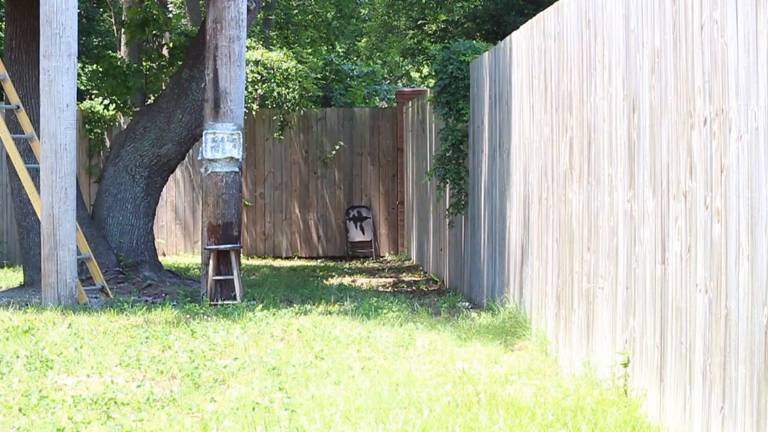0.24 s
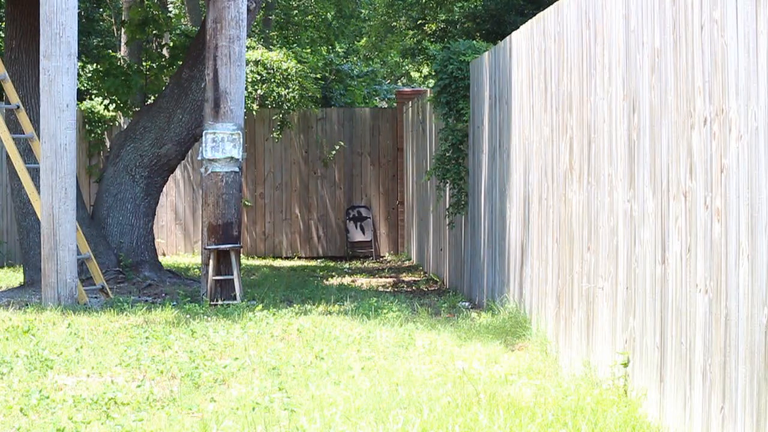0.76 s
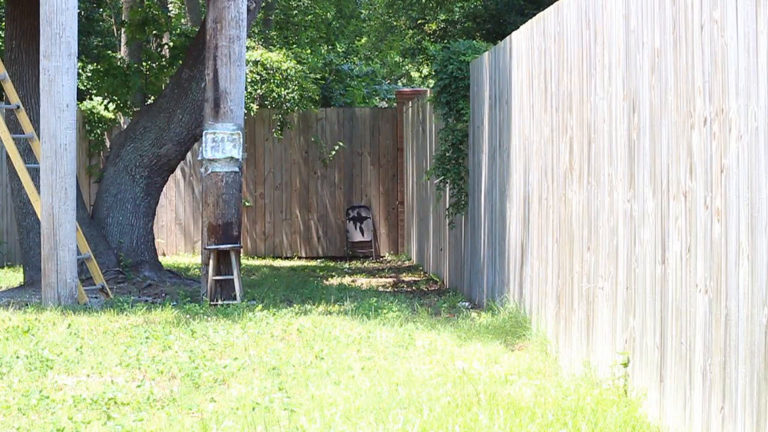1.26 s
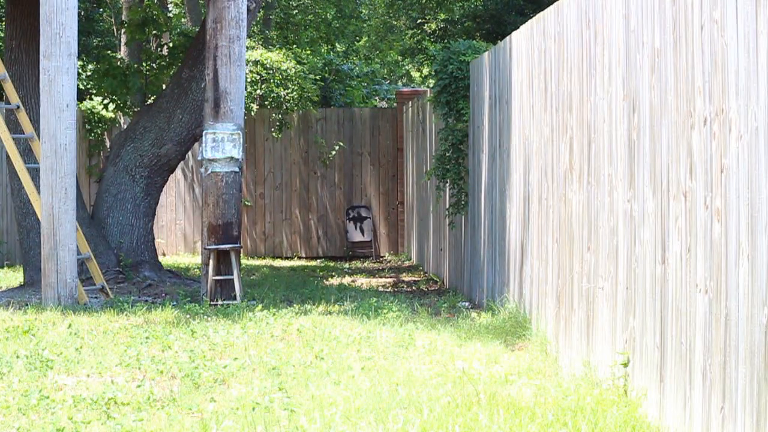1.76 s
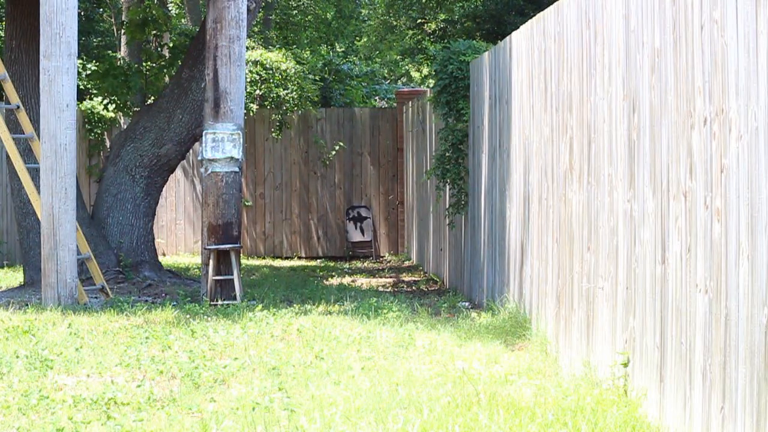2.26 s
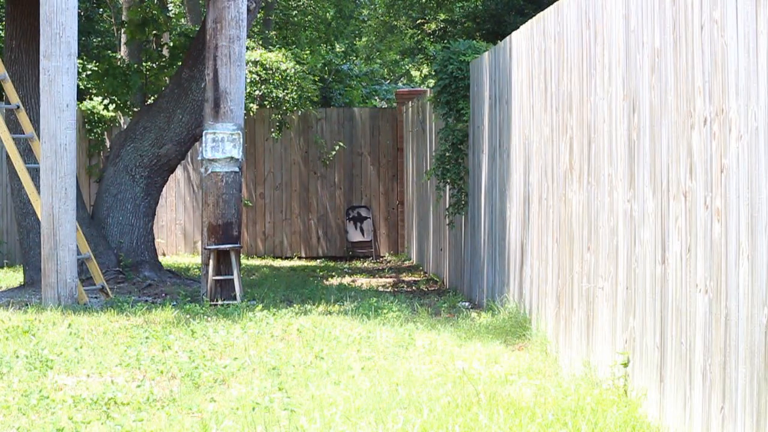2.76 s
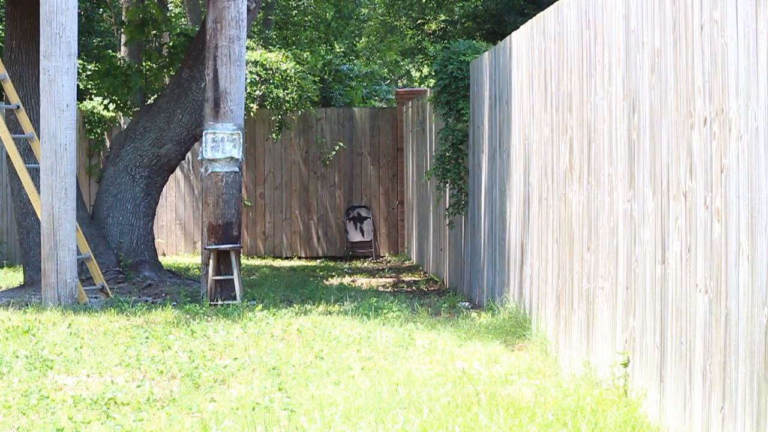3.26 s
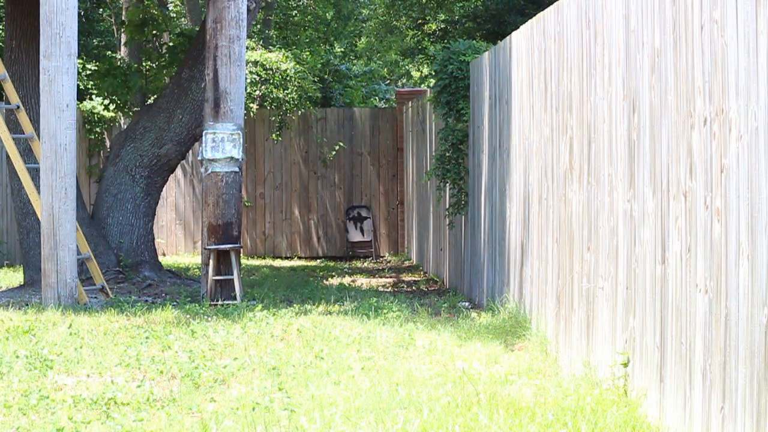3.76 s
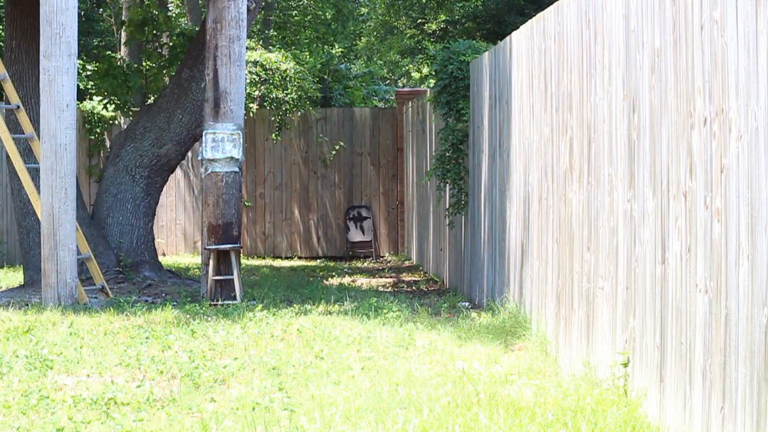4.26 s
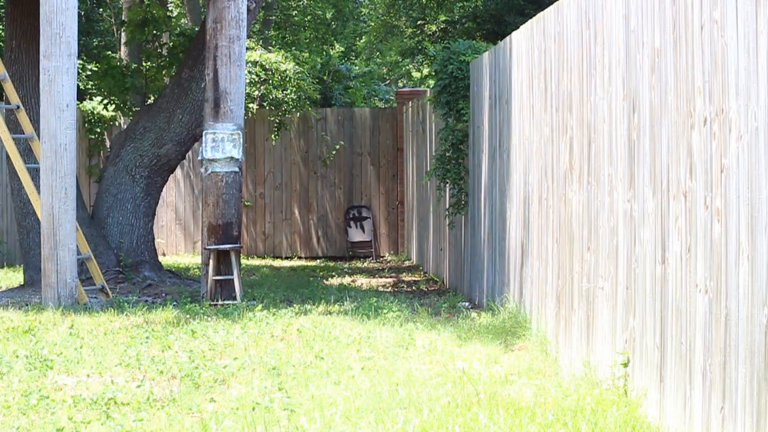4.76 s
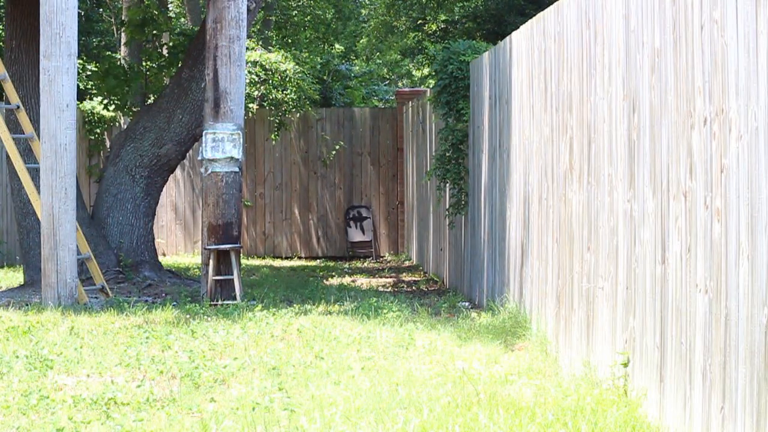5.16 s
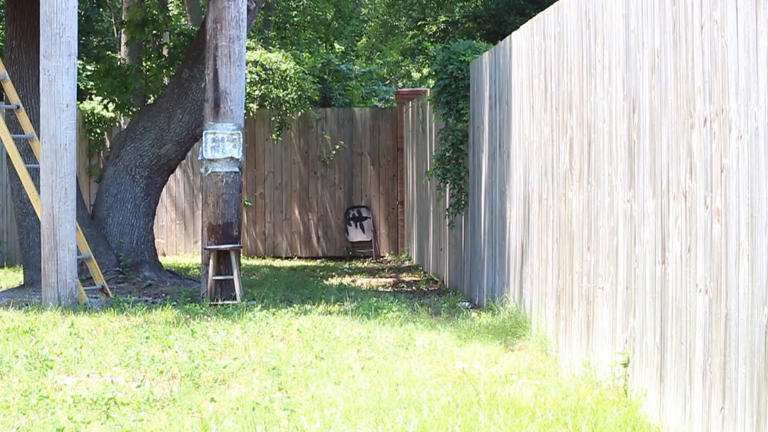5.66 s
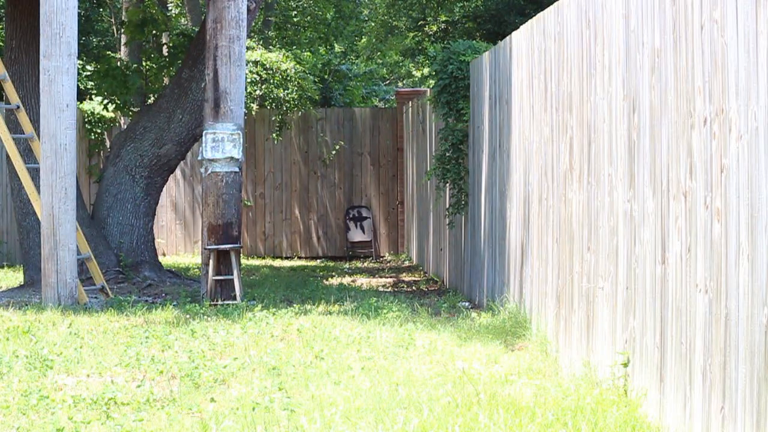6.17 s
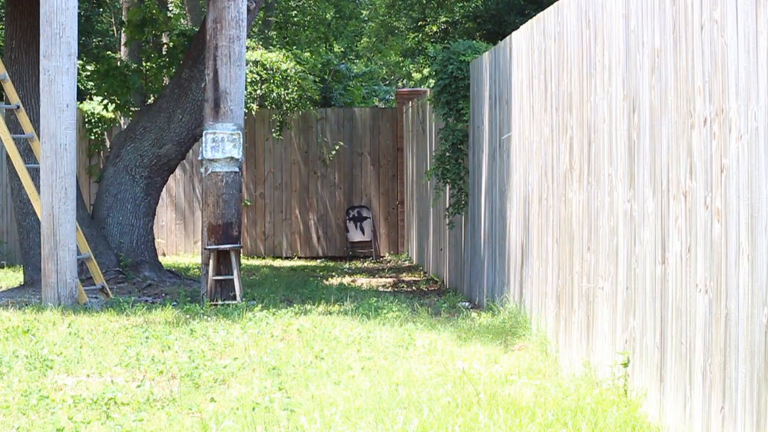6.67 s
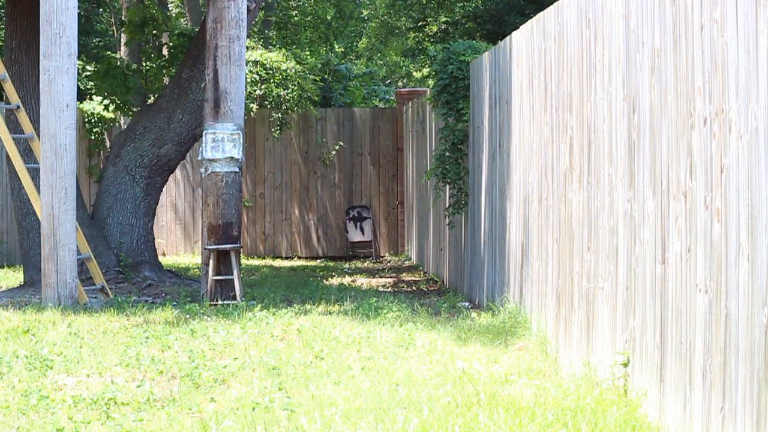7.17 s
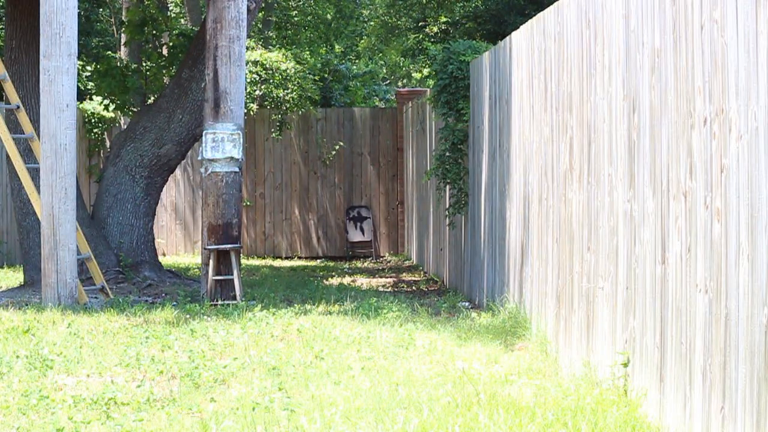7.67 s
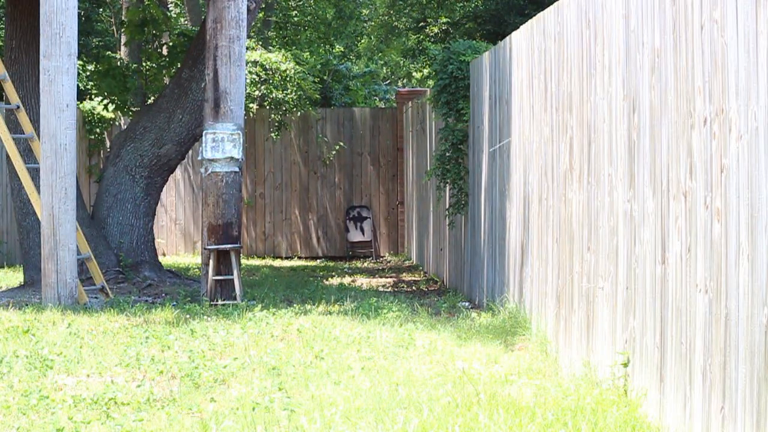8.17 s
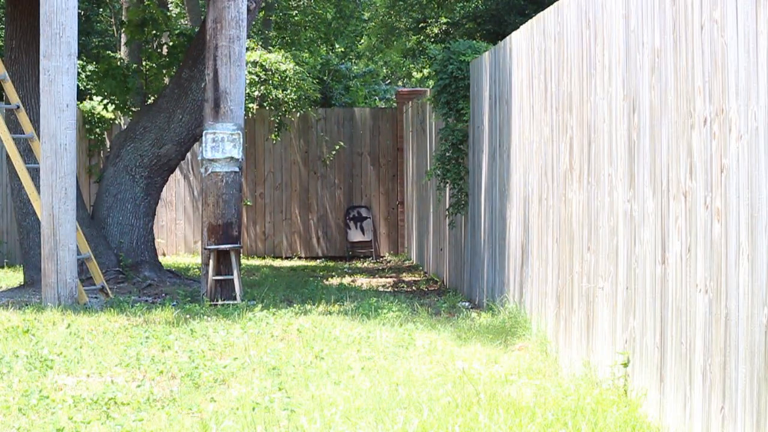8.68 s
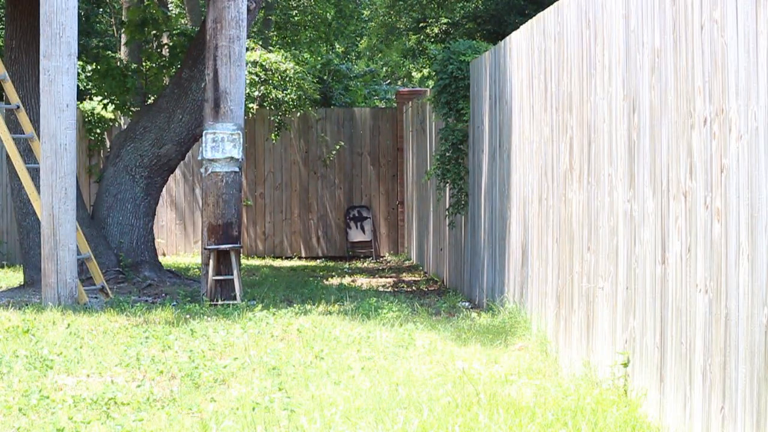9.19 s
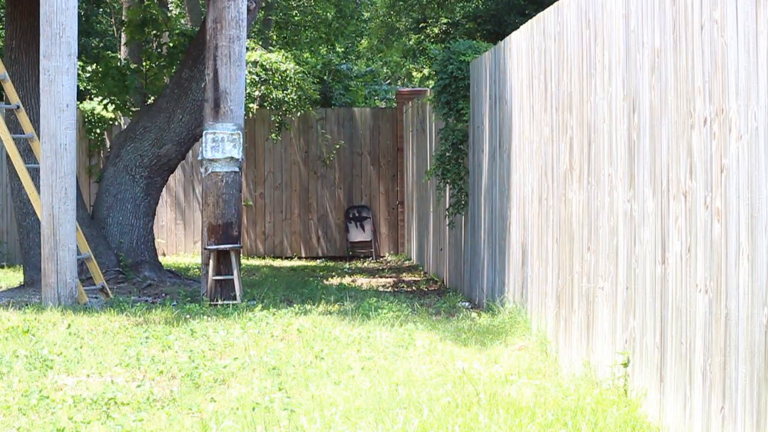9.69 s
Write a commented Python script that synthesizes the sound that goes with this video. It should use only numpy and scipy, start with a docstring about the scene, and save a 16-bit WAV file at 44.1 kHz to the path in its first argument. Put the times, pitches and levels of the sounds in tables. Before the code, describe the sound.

An electric airsoft rifle fires steady single shots in a fenced yard, each a short gear whirr and sharp pop, then a metallic target ring.

```python
"""An electric airsoft rifle fires twelve single shots in a fenced back yard, close to the microphone.
Each time the gears wind the spring, the piston slams home with a pop, and the fences echo it.
About half a second after each shot but the last, the pellet excites the modes of a sheet-metal target;
one such ring comes before the first shot. A far engine is a gliding near-sine, wind and air are coloured
noise, the hum is a sine, and an insect and birds are narrow-band noise, all faint behind the shots."""
import sys
import numpy as np
from scipy import signal
from scipy.fft import rfft, irfft, next_fast_len
from scipy.io import wavfile

SR = 44100
rng = np.random.default_rng(int(sys.argv[2]) if len(sys.argv) > 2 else 0)


def output_pcm(signal):
    """Save a mono or channel-first signal as 16-bit PCM at the path in sys.argv[1].

    Samples are clipped to [-1, 1] before scaling.
    """
    pcm = np.clip(np.atleast_2d(signal).T, -1, 1) * 32767
    wavfile.write(sys.argv[1], SR, np.round(pcm).astype(np.int16))


N = 437913
TIME = np.arange(N) / SR   # s

# Table levels are relative: each source adds its own trim. Spectra are shapes, scaled to unit power.

# Background
# Wind spectrum on the microphone: f/Hz, level/dB
WIND_SPECTRUM = [(12, -2.5), (25, 2.5), (42, -3), (65, -6.5), (100, -15), (160, -30), (300, -47),
                 (1000, -76), (8000, -110)]
# Spectrum of the neighbourhood's hush: f/Hz, level/dB
AIR_SPECTRUM = [(40, -5), (120, 0), (180, -6.5), (300, -13), (550, -17.5), (1000, -19), (2000, -25.5),
                (4000, -33.5), (6000, -42.5), (8000, -47.5), (12000, -51), (16000, -76)]
# Strength of the breeze: t/s, level/dB
BREEZE_LEVEL = [(0, -46.5), (.65, -50), (.9, -56.5), (1.5, -39.5), (2.8, -39), (3.3, -44.5), (4.1, -41),
                (4.6, -46), (5.4, -42), (6.0, -46.5), (7.0, -43.5), (8.4, -38.5), (8.8, -51.5), (9.4, -46),
                (9.93, -45.5)]
# Gusts that buffet the microphone: t of peak/s, length/s, level/dB
GUSTS = [(2.052, 0.41, -38.5), (5.02, .58, -31), (7.66, 0.19, -34), (8.206, 0.31, -34), (9.15, .3, -31.5)]
# Engine loudness as the air carries it over: t/s, level/dB
ENGINE_LEVEL = [(0.0, -63), (0.61, -56), (2.68, -38), (3.04, -51.5), (3.43, -39), (3.51, -44), (4.7, -35),
                (5.2, -52), (5.58, -38), (5.95, -53), (6.19, -39), (6.61, -46.5), (6.88, -36), (7.11, -44),
                (7.38, -34.5), (7.55, -45), (8.54, -46), (8.63, -40), (8.99, -57.5), (9.18, -43.5),
                (9.49, -60.5), (9.93, -48)]
# The engine runs up to speed, quickly at first, then creeping on to its top speed
ENGINE_START_HZ, ENGINE_RUN_UP_HZ, RUN_UP_S, CREEP_HZ_PER_S, TOP_SPEED_HZ = 74.76, 13, .85, .95, 94.6
# The insect chirps in pairs at a nearly steady pace
FIRST_CHIRP_S, CHIRP_PERIOD_S, PAIR_GAP_S, CHIRP_JITTER_S = .05, 1, .16, .02
# Whistles of far birds: t/s, length/s, f/Hz, level/dB
BIRD_CALLS = [(1.0, .22, 5600, -78), (7.331, 0.11, 3800, -79), (7.4, 0.098, 5640, -82),
              (8.138, .14, 3800, -74.5), (8.25, .1, 5710, -81.5)]

# Target
# Pellet on the plate: t/s, low ring level/dB, high ring level/dB
PELLET_HITS = [(0.3285, -43, -42), (1.2079, -43, -40.5), (2.14, -56.5, -52), (3.075, -58, -52.5),
               (3.9875, -44.5, -40), (4.9209, -43, -41), (5.829, -43, -42), (6.754, -63.5, -72),
               (7.585, -45.5, -42.5), (8.4099, -53.5, -58.5), (9.0827, -47.5, -40), (9.8161, -47, -40)]
# Spectrum of the struck plate: f/Hz, level/dB
PLATE_SPECTRUM = [(500, -24.5), (1000, -14), (1400, -10.5), (2000, -0.5), (2600, -3), (3600, -1.5),
                  (5300, 1), (7000, -0.5), (9000, 1.5), (12500, 2), (14500, -5), (16000, -24.5)]
# Decay of the plate by 60 dB: f/Hz, t60/s
PLATE_DECAY = [(1000, 1.5), (2000, .85), (4000, .68), (6000, 0.57), (10000, 0.39), (16000, 0.19)]
# The plate's clearest modes: f/Hz, level/dB
PLATE_MODES = [(1098, -12.5), (1550, -8), (1911, -4), (3168, -4), (3563, -6), (3744, -0.5), (4163, -8.5),
               (5342, -3.5)]
# A few modes set singing by two glancing hits: t/s, f/Hz, level/dB, t60/s
GLANCING_PINGS = [(3.075, 9100, -56, 0.51), (3.075, 9100, -37, 0.025), (3.075, 12400, -40, 0.016),
                  (3.075, 5100, -56.5, 0.34), (3.075, 11400, -60.5, .35), (8.4102, 10220, -36, 0.07),
                  (8.4104, 3520, -50.5, 0.12), (8.4104, 5225, -51, .12), (8.4104, 1900, -52, .12)]

# Yard
# Echoes off fences and trees: delay/s, level/dB, smear/s, low-pass f/Hz
ECHOES = [(.0047, -9, .00012, 15000), (.073, -27.5, 0.0052, 7010), (.117, -31.5, 0.01, 2802),
          (.229, -41.5, 0.0086, 3500), (.272, -55.5, 0.018, 8800)]
# Decay of the yard's tail by 60 dB: f/Hz, t60/s
YARD_DECAY = [(150, .4), (600, .6), (2000, 0.93), (5000, 0.54), (10000, 0.44), (16000, 0.32)]

# Rifle
# Shots: t of the piston's impact/s, crack level/dB, motor level/dB, body ring level/dB, wind-up/s
SHOTS = [(0.6568, -1, 0.5, 1, 0.11), (1.5875, -3, 1, 1.5, 0.1), (2.525, -2, -0.5, 0.5, 0.1),
         (3.4356, -2.5, 1, 0, 0.1), (4.3667, -3, 0.5, 1, 0.1), (5.275, -1.5, 0.5, 1, 0.11),
         (6.1814, -2.5, 0, -0.5, 0.1), (7.0297, -4.5, -1, -2, 0.1), (7.8524, -5.5, -1.5, -1, .102),
         (8.525, -4.5, -1, -2, 0.1), (9.2588, -4.5, -1.5, -3, 0.11), (9.9238, -5.5, -1.5, 4, 0.1)]
# Sear, piston sliding, piston head, air blast, rebounds, latch: t from impact/s, level/dB, fade/s
FIRING_CONTACTS = [(-.0099, -23, 0.0014), (-.0064, -19.5, 0.0032), (-.0036, -19, .003),
                   (-.0022, -13.5, .0015), (-.0012, -4.5, 0.00072), (-.0002, 3, .0004), (0.0113, -22, .003),
                   (0.0188, -23.5, 0.0034), (.068, -42, .009)]
# Spectrum of the contacts: f/Hz, level/dB
CRACK_SPECTRUM = [(200, -9.5), (620, -14.5), (1000, -6), (2000, -4.5), (3000, -5), (5000, -3.5), (6200, -5),
                  (8700, -1.5), (12000, -2.5), (13800, -1.5), (16000, -16.5)]
# Nominal modes of the hollow body: f/Hz, level/dB, t60/s, t from impact/s
BODY_MODES = [(133.4, -33, 0.12, -.002), (279, -36, 0.09, -0.0078), (775, -26.5, 0.0036, -.0012),
              (383, -30.5, 0.045, .004), (497, -25.5, .06, 0.011), (730, -38.5, 0.027, 0.022),
              (814, -25, .05, .0045), (857, -26.5, .05, .0057), (1233, -30.5, .06, .0046),
              (1310, -31, 0.03, .0053)]
# Gearbox resonances: f/Hz, width/Hz, level over the broad whirr/dB
GEARBOX_MODES = [(500, 150, 5), (826, 160, 4), (1040, 60, 5), (1375, 70, 12), (1709, 47, 14.5),
                 (2710, 110, 6.5), (3000, 80, 4), (3290, 230, 8.5), (3430, 170, 3.5), (5370, 150, 6.5)]
# Spectrum of the broad whirr: f/Hz, level/dB
WHIRR_SPECTRUM = [(150, -21.5), (350, -14.5), (500, -3.5), (650, -4), (900, 1.5), (1500, -4.5), (2300, -3),
                  (3600, -4.5), (6000, -8.5), (8500, -13.5), (12500, -13), (14500, -21.5), (16000, -38)]
# Load on the gears: t as a share of the wind-up, level/dB
GEAR_LOAD = [(0, -17.5), (.22, -10), (.4, -4), (.62, -2), (.9, -2), (1.05, -7.5), (1.65, -9.5), (1.9, -33)]
# Knocks as the trigger resets after most shots: t/s, level/dB
RESET_KNOCKS = [(0.7735, -42.5), (1.6946, -47.5), (2.642, -43), (4.4706, -47), (5.3908, -41.5),
                (6.2941, -44.5), (7.152, -43.5), (7.9564, -49), (8.6359, -46)]
# Trigger clicks: t/s, level/dB
TRIGGER_CLICKS = [(6.7541, -50.5), (6.768, -53), (7.2988, -51), (7.309, -53.5), (8.0557, -48.5),
                  (8.341, -64), (8.887, -48), (8.896, -55.5), (9.5458, -49), (9.749, -63)]
# Spectrum of the trigger clicks: f/Hz, level/dB
TRIGGER_SPECTRUM = [(300, -17), (1000, -1.5), (2800, 3), (6000, -2.5), (11000, -3), (13500, -4),
                    (16000, -32.5)]
# Spring and loose parts after the impact: f/Hz, level/dB
SHIVER_SPECTRUM = [(200, -11.5), (500, -3.5), (900, 2), (2000, 0), (3500, 0.5), (6000, -4), (9000, -1.5),
                   (12500, -5.5), (14500, -18), (16000, -36)]
# Decay of their shiver by 60 dB: f/Hz, t60/s
SHIVER_DECAY = [(300, 0.53), (1500, 0.93), (4000, .52), (9000, .42), (16000, .25)]
# Hollow tones of one shot: t/s, f/Hz, level/dB, t60/s
HOLLOW_TONES = [(6.183, 343, -26, 0.073), (6.183, 154.4, -32, 0.1)]


def from_db(db):
    """Level in decibels to amplitude ratio."""
    return 10 ** (np.asarray(db) / 20)


def rms_one(x):
    """Normalise to unit root-mean-square."""
    return x / np.sqrt(np.mean(x ** 2) + 1e-20)


def at_hz(points, hz):
    """Interpolate a frequency table on a logarithmic frequency axis."""
    known, values = np.transpose(points)
    return np.interp(np.log(np.maximum(hz, 1)), np.log(known), values)


def add(out, s, sound):
    """Superpose a sound at time s, cut to fit."""
    start = int(round(s * SR))
    first = max(start, 0)
    last = min(start + sound.shape[-1], out.shape[-1])
    if last > first:
        out[..., first:last] += sound[..., first - start:last - start]


def colour(x, spectrum, size=8192):
    """Minimum-phase filtering by the folded cepstrum; white noise keeps its power."""
    level = at_hz(spectrum, np.fft.rfftfreq(size, 1 / SR))
    cepstrum = irfft(np.log(from_db(level)))
    cepstrum[1:size // 2] *= 2
    cepstrum[size // 2 + 1:] = 0
    response = irfft(np.exp(rfft(cepstrum)))
    response /= np.linalg.norm(response)
    response = response.reshape((1,) * (x.ndim - 1) + (-1,))
    return signal.oaconvolve(x, response, axes=-1)[..., :x.shape[-1]]


def resonance(x, hz, width):
    """Two-pole resonance of this bandwidth (Hz), near unit gain at its peak."""
    r = np.exp(-np.pi * width / SR)
    zeros = np.array([1, 0, -1]) * (1 - r * r) / 2
    poles = [1, -2 * r * np.cos(2 * np.pi * hz / SR), r * r]
    return signal.lfilter(zeros, poles, x + 1e-18)


def ring(hz, t60, phase=0):
    """Free vibration of one damped mode: a sine in an exponential envelope of initial height 1."""
    t = TIME[:SR // 2]
    return np.sin(2 * np.pi * hz * t + phase) * np.exp(-np.log(1000) * t / t60)


def burst(fade, channels=1):
    """Flat-spectrum decaying noise, with the energy of an exponential envelope starting at 1."""
    envelope = np.exp(-TIME[:SR // 8] / fade)
    noise = rng.standard_normal((channels, len(envelope))) * envelope
    # keep the phases, make every magnitude equal
    flat = irfft(np.exp(1j * np.angle(rfft(noise))), len(envelope))
    noise = flat * envelope ** (1 / 4)
    return noise * np.linalg.norm(envelope) / np.linalg.norm(noise, axis=-1, keepdims=True)


def dying(x, t60_table, count=12):
    """Frequency-dependent damping: overlapping bands each decay at their own rate."""
    size = x.shape[-1]
    hz_axis = np.fft.rfftfreq(size, 1 / SR)
    centres = np.geomspace(150, 16000, count)
    spectrum, out = rfft(x), 0
    for hz, share in zip(centres, np.eye(count)):
        band = irfft(spectrum * np.interp(hz_axis, centres, share), size)
        out = out + band * np.exp(-np.log(1000) * TIME[:size] / at_hz(t60_table, hz))
    return out


def blend(pair, alike):
    """Interchannel correlation: mix two unrelated signals as sum and difference."""
    alike = np.clip(alike, 0, 1)
    middle = np.sqrt(1 + alike) * pair[0]
    side = np.sqrt(1 - alike) * pair[1] * np.array([[1], [-1]])
    return (middle + side) / np.sqrt(2)


def whistle(hz, length, width):
    """Narrow-band noise from two cascaded resonances, in a half-sine swell, at unit rms."""
    size = int(length * SR)
    narrow = resonance(rng.standard_normal((2, size)), hz, width)
    narrow = resonance(narrow, hz, width)
    return rms_one(narrow * np.sin(np.pi * np.arange(size) / size))


def drift(rate, step=200):
    """Low-passed random fluctuation of unit spread with a corner at about this rate (Hz)."""
    size = N // step
    r = np.exp(-2 * np.pi * rate * step / SR)
    slow = signal.lfilter([1], [1, -2 * r, r * r], rng.standard_normal(2 * size))
    return np.interp(np.arange(N) / step, np.arange(size), rms_one(slow[size:]))   # settled half


def hum(level_db=-62, pitch_hz=120):
    """A steady pure tone: the faint electrical hum of the neighbourhood."""
    return np.sqrt(2) * from_db(level_db) * np.sin(2 * np.pi * pitch_hz * TIME)


def outdoors(wind_db=1.04, air_db=-56, eddy_db=1.5, eddy_rate=5, wind_alike=0.97):
    """Turbulent pressure: noise modulated by breeze, gusts and eddies, over a steady hush of air."""
    force = from_db(np.interp(TIME, *np.transpose(BREEZE_LEVEL)))
    for s, length, db in GUSTS:
        gust = from_db(db) * np.exp(-(2 * (TIME - s) / length) ** 4)
        force = np.hypot(force, gust)
    eddies = from_db(wind_db + eddy_db * drift(eddy_rate))
    rumble = colour(blend(rng.standard_normal((2, N)), alike=wind_alike), WIND_SPECTRUM)
    hush = colour(blend(rng.standard_normal((2, N)), alike=.55), AIR_SPECTRUM)
    return force * eddies * rumble + from_db(air_db) * hush


def insect(level_db=-82.5, pitch_hz=9800, width=350, length=0.068):
    """Periodic stridulation: thin, high narrow-band chirps from the hedge, two at a time."""
    out = np.zeros((2, N))
    for s in np.arange(FIRST_CHIRP_S, N / SR, CHIRP_PERIOD_S):
        for offset in (0, PAIR_GAP_S):
            chirp_s = s + offset + rng.normal(0, CHIRP_JITTER_S)
            add(out, chirp_s, from_db(level_db) * whistle(pitch_hz, length, width))
    return out


def birds(width=220):
    """Narrow-band radiation: thin whistles from far off, their tone blurred by the trees."""
    out = np.zeros((2, N))
    for s, length, hz, db in BIRD_CALLS:
        add(out, s, from_db(db) * whistle(hz, length, width))
    return out


def engine(level_db=0.5, second_db=-29, waver_db=1.6, waver_rate=5, skew=0.58):
    """Harmonic source of rising frequency: a wavering exhaust note, little but its fundamental carrying."""
    run_up = ENGINE_RUN_UP_HZ * (1 - np.exp(-TIME / RUN_UP_S))
    hz = np.minimum(ENGINE_START_HZ + run_up + CREEP_HZ_PER_S * TIME, TOP_SPEED_HZ)
    # fence echoes skew the phase (radians) between the sides
    phase = 2 * np.pi * np.cumsum(hz) / SR + skew * np.array([[.5], [-.5]])
    db = np.interp(TIME, *np.transpose(ENGINE_LEVEL)) + level_db + waver_db * drift(waver_rate)
    note = np.sin(phase) + from_db(second_db) * np.sin(2 * phase)
    return np.sqrt(2) * from_db(db) * note


def target(low_db=7.5, high_db=-1, lines_db=-7, split_hz=4500, bloom=0.012, wash=1.2, count=900):
    """Modal density of a thin plate: crowded modes, excited anew by each hit; the low ones swell in late."""
    out, t = np.zeros((2, N)), TIME[:SR]
    # one-second spectra have 1 Hz bins, so a mode's frequency is its index
    mode_hz = rng.choice(np.arange(500, 16000), count, replace=False)
    low_pass = signal.butter(2, split_hz, fs=SR, output="sos")
    high_pass = signal.butter(2, split_hz, "high", fs=SR, output="sos")
    for s, low_ring_db, high_ring_db in PELLET_HITS:
        struck = np.zeros((2, SR // 2 + 1), complex)
        phases = np.exp(2j * np.pi * rng.random((2, count)))
        struck[:, mode_hz] = rng.standard_normal(count) * phases
        modes = rms_one(rms_one(irfft(struck)) + wash * rng.standard_normal((2, SR)))
        crash = dying(colour(blend(modes, alike=.4), PLATE_SPECTRUM), PLATE_DECAY)
        low_ring = signal.sosfilt(low_pass, crash) * (1 - np.exp(-t / bloom))
        add(out, s, from_db(low_ring_db + low_db) * low_ring)
        add(out, s, -from_db(high_ring_db + high_db) * signal.sosfilt(high_pass, crash))
        for hz, db in PLATE_MODES:
            mode_db = low_ring_db + lines_db + db + rng.normal(-2, 2.1)
            mode = ring(hz, at_hz(PLATE_DECAY, hz), rng.normal(0, 0.98, (2, 1)))
            add(out, s, from_db(mode_db) * mode)
    for s, hz, db, t60 in GLANCING_PINGS:
        add(out, s, from_db(db) * ring(hz, t60, rng.normal(0, .8, (2, 1))))
    return out


def yard(x, scatter_db=-11, scatter_fade=0.021, tail_db=-29, reflection_cut_hz=12800):
    """Impulse response by convolution: direct sound, near-fence scatter, echoes and a thin tail from trees."""
    response, t = np.zeros((2, SR)), TIME[:SR]
    scatter = blend(burst(scatter_fade, channels=2), alike=.1)
    add(response, .0012, from_db(scatter_db) * scatter / np.linalg.norm(scatter[0]))
    for delay, db, smear, dull_hz in ECHOES:
        echo = blend(burst(smear, channels=2), alike=.45)
        echo = echo * np.sqrt(2) / np.linalg.norm(echo)
        dull = signal.butter(1, dull_hz, fs=SR)
        add(response, delay, from_db(db) * signal.lfilter(*dull, echo))
    tail = dying(blend(rng.standard_normal((2, SR)), alike=.4), YARD_DECAY)
    tail = tail * (1 - np.exp(-t / 0.024))
    response += from_db(tail_db) * tail / np.linalg.norm(tail[0])
    # the reflections are duller than the direct sound
    response = signal.sosfilt(signal.butter(6, reflection_cut_hz, fs=SR, output="sos"), response)
    # the gun is a little to the left, so the right side hears it a moment later
    left_lead_s = .000024
    size = next_fast_len(N + SR)
    delay_phase = np.exp(-2j * np.pi * np.fft.rfftfreq(size, 1 / SR) * left_lead_s)
    late = irfft(rfft(x, size) * delay_phase, size)[:N]
    return np.array([x, late]) + signal.oaconvolve(x[None], response, axes=-1)[:, :N]


def shiver(level_db=-40, hollow_db=-0.5):
    """Residual vibration: spring and loose parts rattle after each impact; one shot adds hollow tones."""
    out = np.zeros((2, N))
    for s, crack_db, _, _, _ in SHOTS:
        # the fences spread it wide
        rattle = colour(blend(rng.standard_normal((2, SR // 2)), alike=0.47), SHIVER_SPECTRUM)
        add(out, s, from_db(level_db + crack_db / 2) * dying(rattle, SHIVER_DECAY, count=8))
    for s, hz, db, t60 in HOLLOW_TONES:
        add(out, s, from_db(db + hollow_db) * ring(hz, t60))
    return out


def trigger(level_db=-2, fade=0.0085):
    """Impact noise: small plastic clicks as the trigger is let go and taken up."""
    out = np.zeros(N)
    for s, db in TRIGGER_CLICKS:
        add(out, s, from_db(db + level_db) * burst(fade)[0])
    return colour(out, TRIGGER_SPECTRUM)


def gears(level_db=-35.5, mesh_hz=1560, grind=1.3, knock_db=0.5, knock_fade=0.017):
    """Forced vibration: teeth mesh faster and harder as the spring is wound, then fade, ringing the housing."""
    drive, t = np.zeros(N), TIME[:SR // 4]
    for s, _, motor_db, _, wind_up in SHOTS:
        turns = np.cumsum(mesh_hz * (1 - np.exp(-t / .025))) / SR
        # one click of random strength at each whole count
        teeth = np.diff(np.floor(turns), prepend=0) * rng.normal(1, 1.0, len(t))
        load = from_db(np.interp(t / wind_up, *np.transpose(GEAR_LOAD), right=-np.inf))
        mesh = rms_one(rms_one(teeth) + grind * rng.standard_normal(len(t)))
        add(drive, s - wind_up, from_db(level_db + motor_db) * load * mesh)
    for s, db in RESET_KNOCKS:
        add(drive, s, from_db(db + knock_db) * burst(knock_fade)[0])
    housing = drive.copy()
    for hz, width, db in GEARBOX_MODES:
        housing += (from_db(db) - 1) * resonance(drive, hz, width)
    return colour(housing, WHIRR_SPECTRUM) / np.sqrt(2)


def piston(pop_db=-7, pop_width=.00006, body_db=-1.5):
    """Impulsive excitation: hard contacts, a pulse of air from the muzzle and the body's free modes."""
    contacts, out = np.zeros(N), np.zeros(N)
    # derivative of a Gaussian with peaks of 1, centred 2 ms in
    u = (TIME[:SR // 250] - 1 / 500) / pop_width
    pop = u * np.exp((1 - u * u) / 2)
    for s, crack_db, _, ring_db, _ in SHOTS:
        for offset, db, fade in FIRING_CONTACTS:
            contact_s = s + offset + rng.normal(0, .00006)
            contact_db = crack_db + db + rng.normal(0, 1)
            add(contacts, contact_s, from_db(contact_db) * burst(fade)[0])
        add(out, s - .0021, from_db(crack_db + pop_db) * pop)
        for hz, db, t60, delay in BODY_MODES:
            mode_db = body_db + ring_db + db + rng.normal(0, 1.6)
            add(out, s + delay, from_db(mode_db) * ring(hz * rng.normal(1, 0.012), t60))
    return out + colour(contacts, CRACK_SPECTRUM)


def scene(left_db=1.8):
    """Superposition of background, target and rifle, the left side raised over the right by left_db."""
    background = hum() + outdoors() + insect() + birds() + engine()
    rifle = yard(trigger() + gears() + piston()) + shiver()
    return (background + target() + rifle) * from_db([[left_db / 2], [-left_db / 2]])


def record(dry, top=.82, stop_hz=17200):
    """Soft saturation rounds the cracks by overload; a low-pass holds all above stop_hz 70 dB down."""
    low_pass = signal.cheby2(14, 70, stop_hz, fs=SR, output="sos")
    return signal.sosfilt(low_pass, top * np.tanh(dry / top))


dry = scene()
out = record(dry)
output_pcm(out)
```